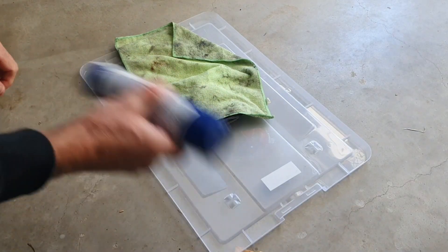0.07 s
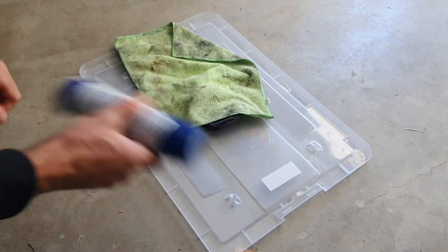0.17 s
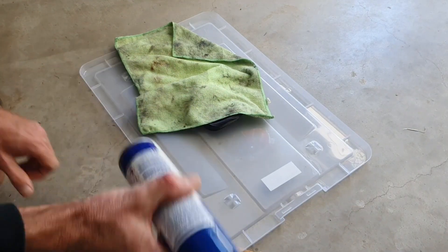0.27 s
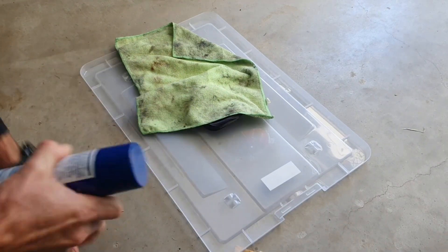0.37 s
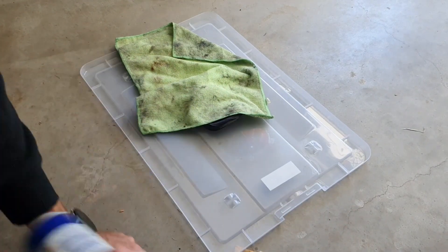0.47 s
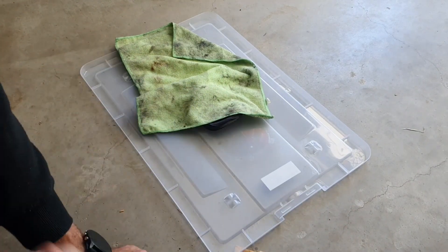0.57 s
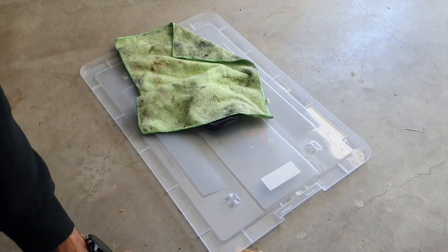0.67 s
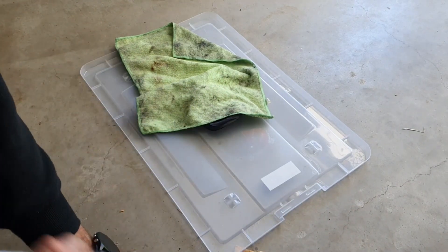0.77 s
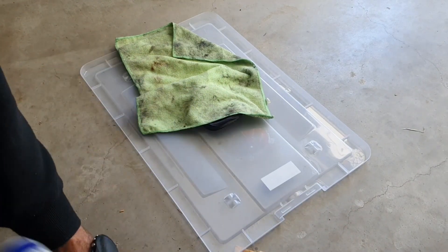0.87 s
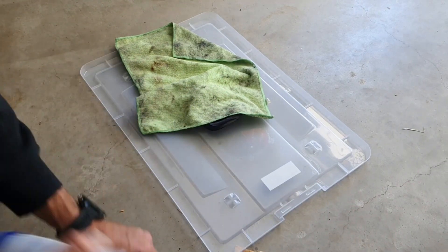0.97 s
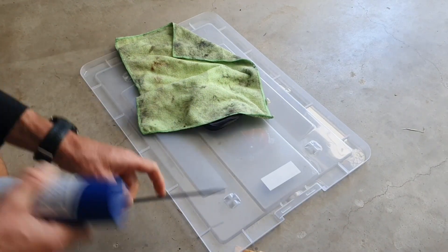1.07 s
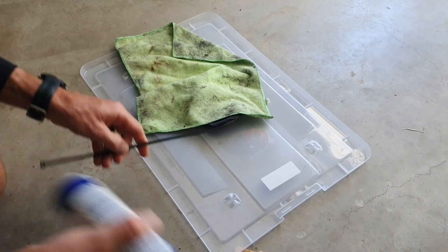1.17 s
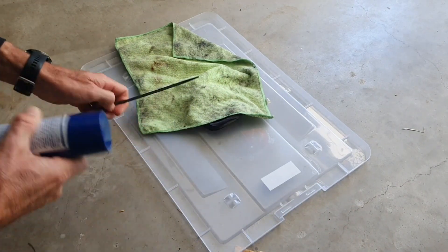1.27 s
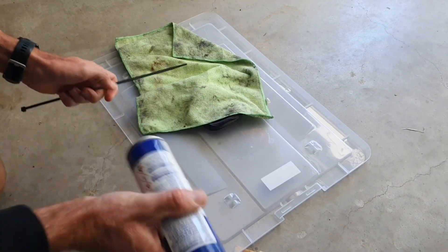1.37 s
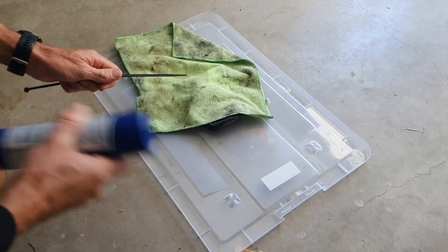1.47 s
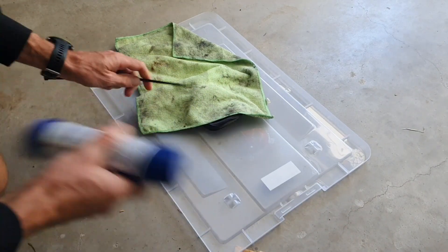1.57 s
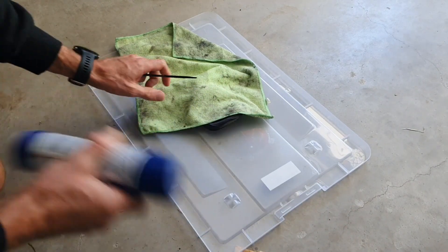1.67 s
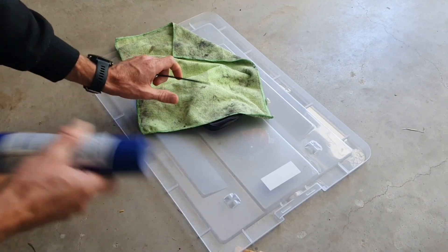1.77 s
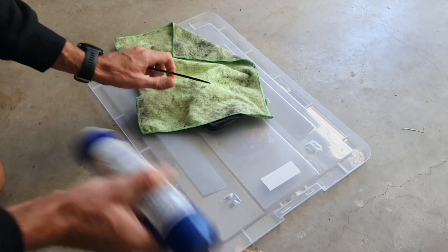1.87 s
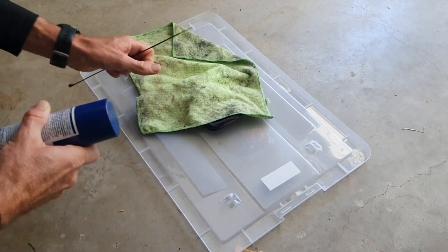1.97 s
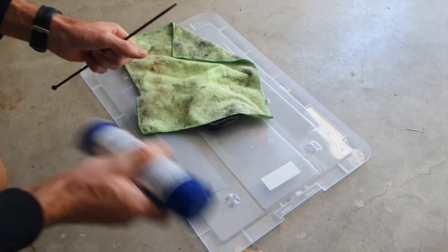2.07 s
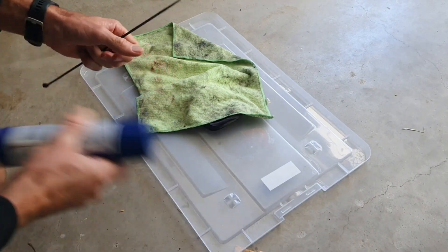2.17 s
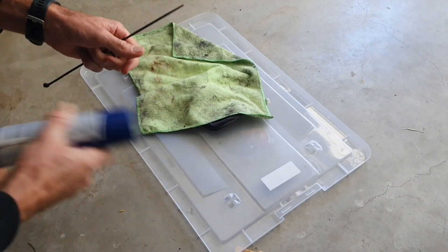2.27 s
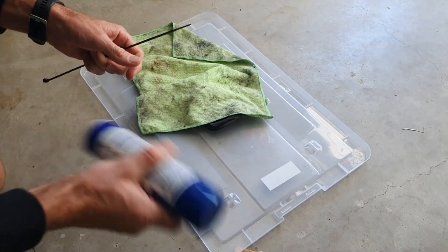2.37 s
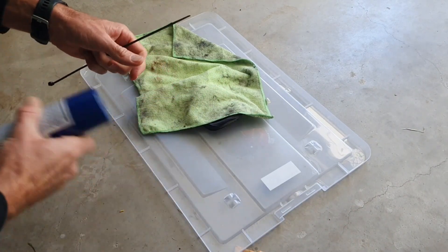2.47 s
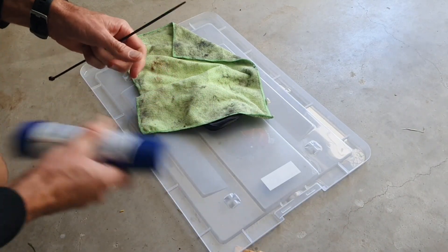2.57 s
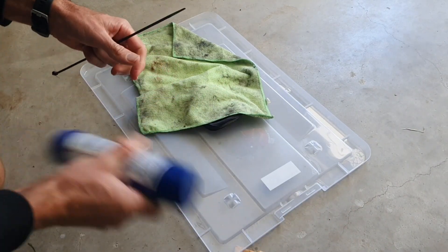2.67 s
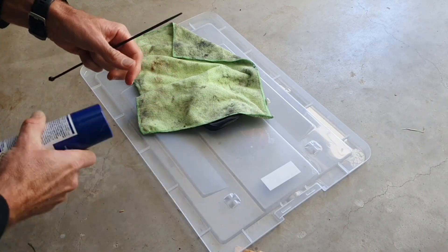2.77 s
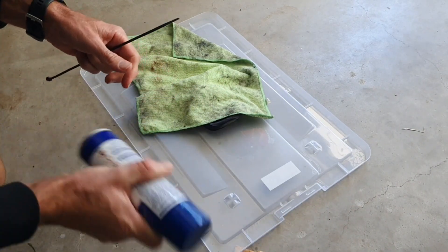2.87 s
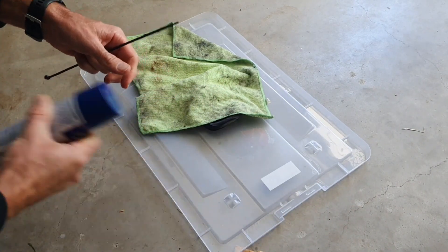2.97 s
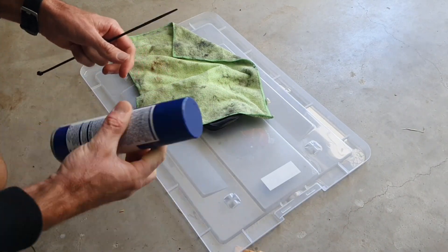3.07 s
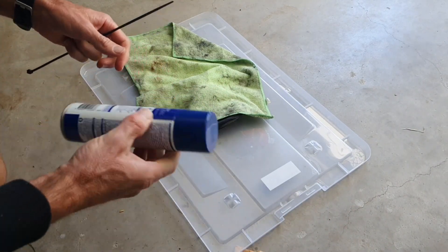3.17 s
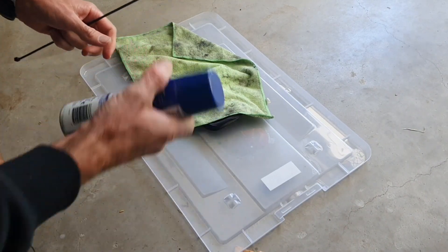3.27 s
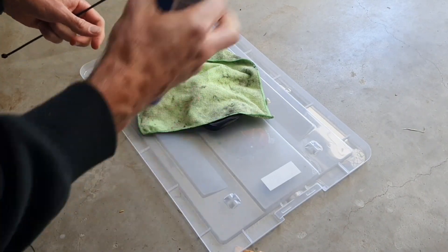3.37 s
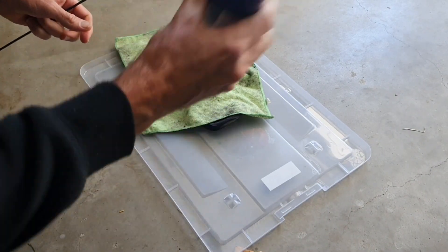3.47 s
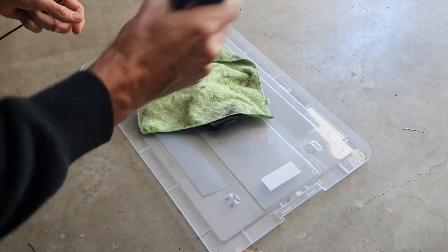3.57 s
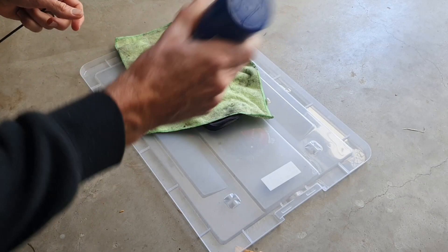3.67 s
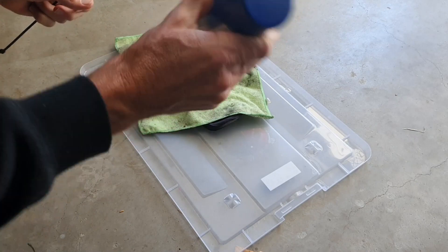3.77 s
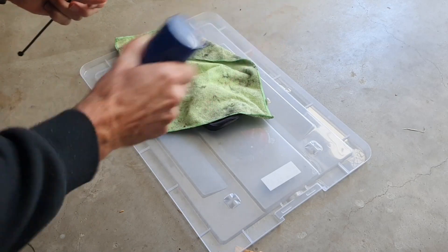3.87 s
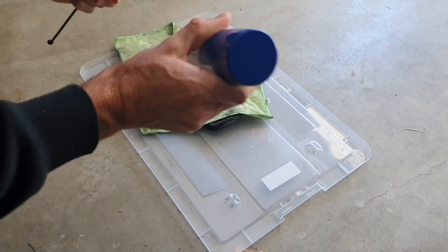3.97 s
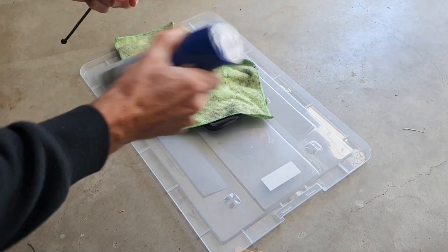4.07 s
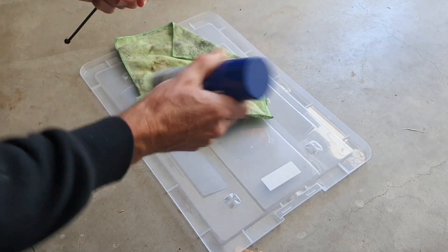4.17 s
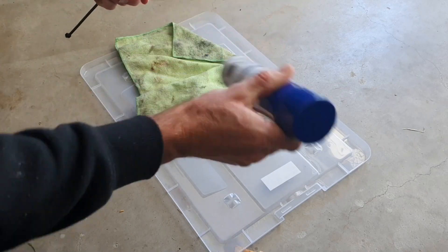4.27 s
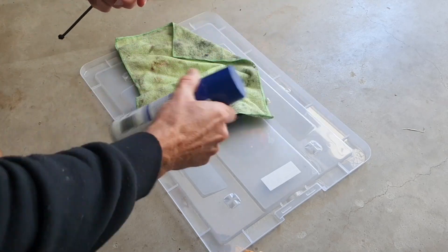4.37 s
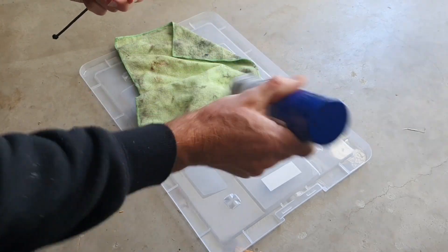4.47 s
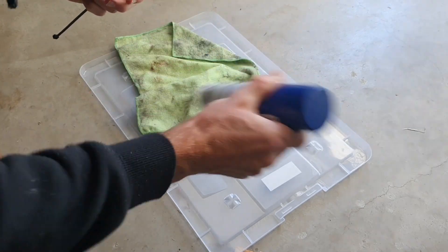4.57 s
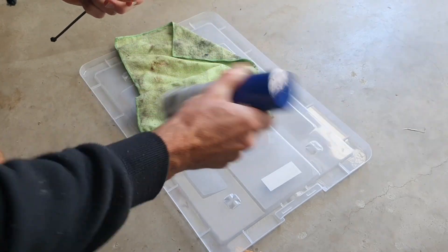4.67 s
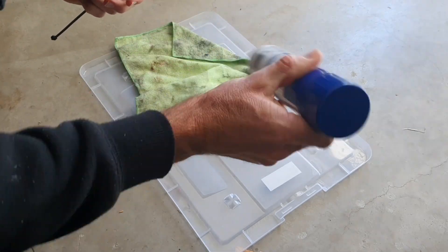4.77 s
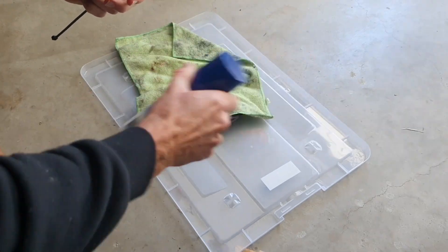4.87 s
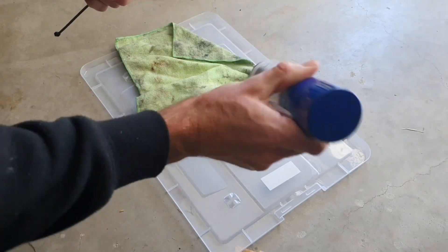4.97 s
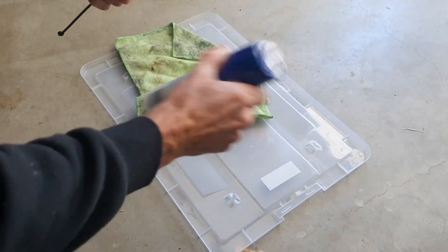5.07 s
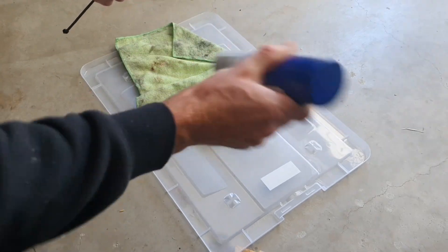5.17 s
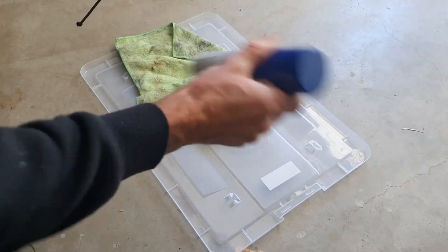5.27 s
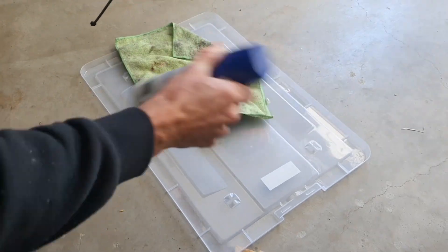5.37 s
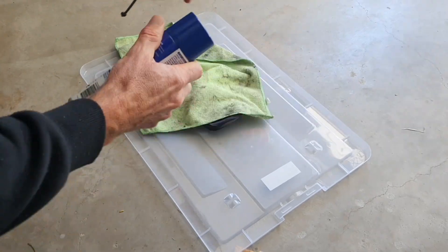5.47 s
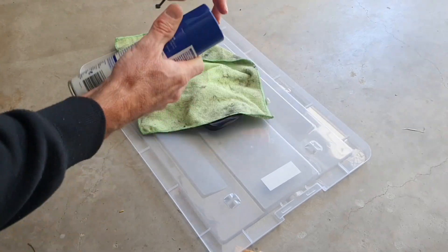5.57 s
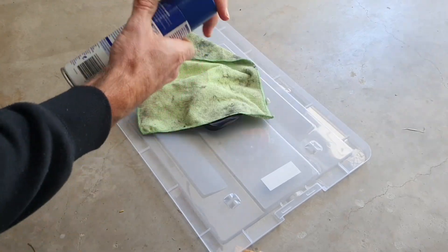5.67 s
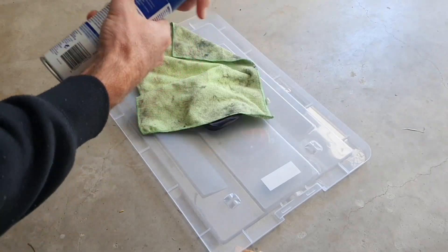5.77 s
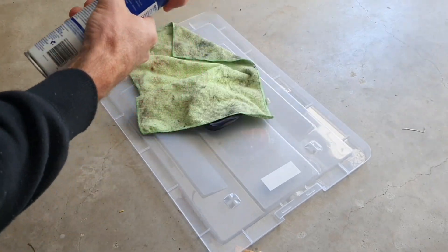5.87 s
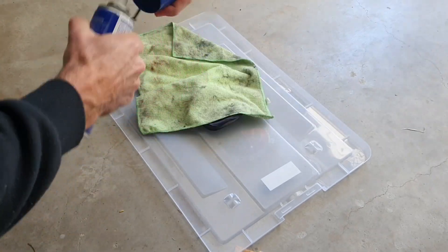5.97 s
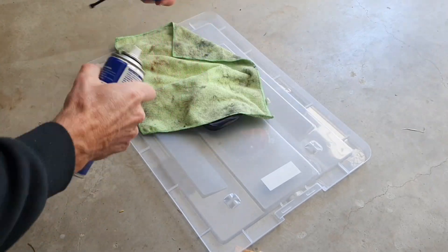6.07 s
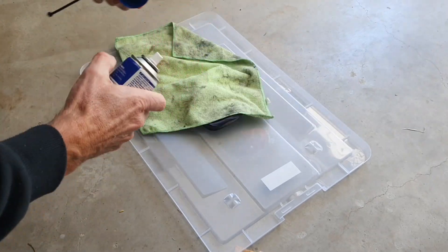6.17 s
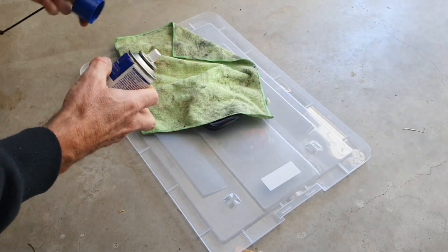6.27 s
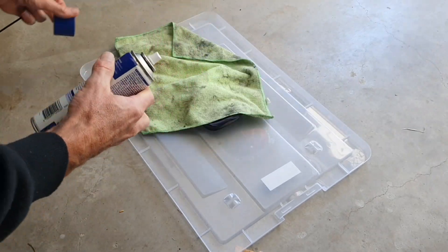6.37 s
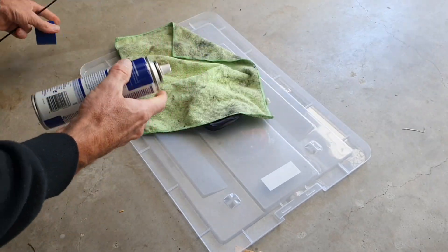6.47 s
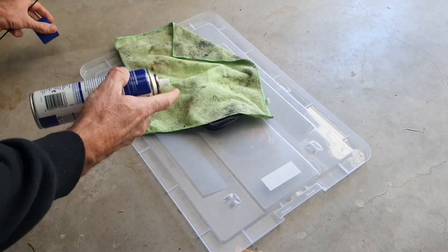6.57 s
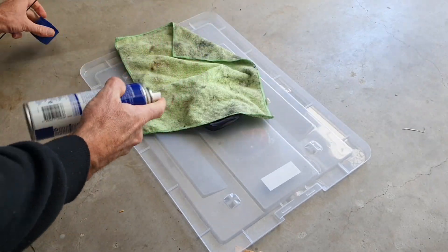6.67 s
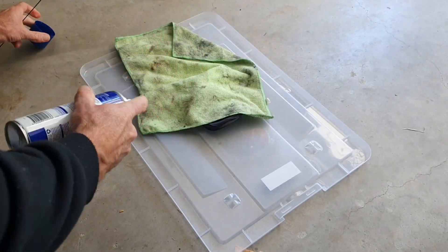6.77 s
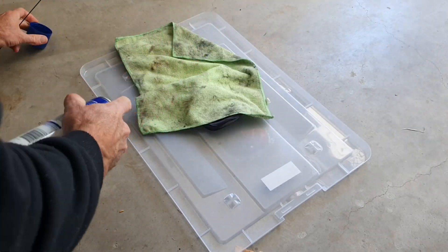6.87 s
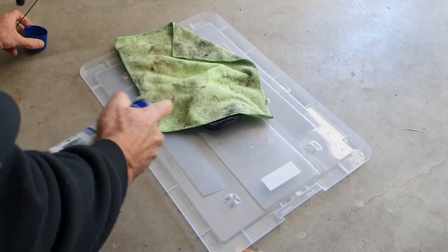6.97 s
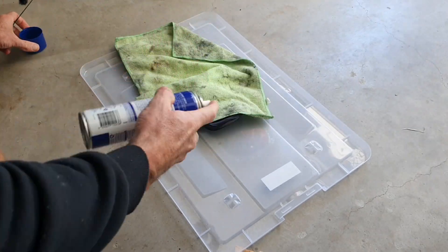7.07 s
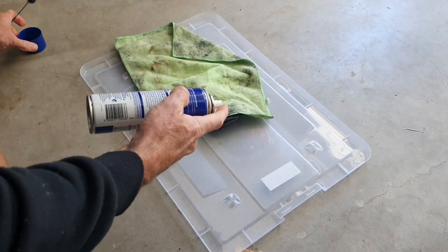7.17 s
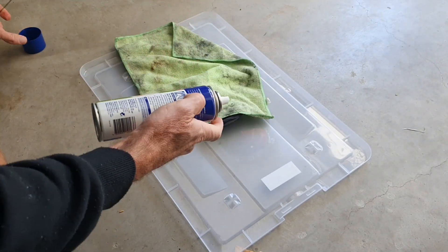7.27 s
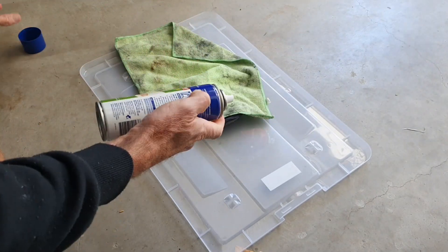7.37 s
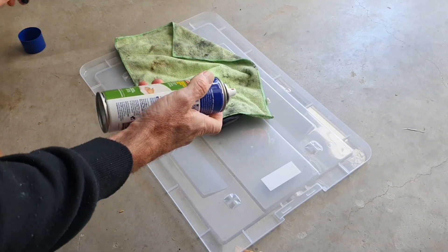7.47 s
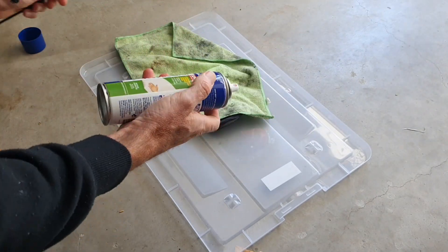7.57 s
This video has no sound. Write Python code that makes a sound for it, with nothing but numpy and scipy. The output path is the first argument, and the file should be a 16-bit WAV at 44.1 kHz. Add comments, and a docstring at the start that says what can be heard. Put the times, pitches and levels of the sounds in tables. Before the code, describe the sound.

Two bursts of loud, sharp spray-can rattling, roughly three seconds and two seconds long, separated by a brief lull with faint rustling. Each shake mixes metallic clacks with hissy liquid slosh and short garage reflections. Then quiet handling: a cap pulled off with a snap, hollow plastic bouncing on concrete, airy rustles, and light ball ticks as the can turns. Close stereo microphone, source left, faint low rumble behind.

```python
"""Over soft rumble and air, a steel can is shaken in two bursts just above a concrete garage floor, to the left.
A mixing ball rings the dull base and bright wall; noise makes the liquid slosh, with a faint hiss before each blow.
Low thuds join in during the first burst, and small whistles and rustles begin between the bursts.
Then the plastic cap comes off with clicks and a rush of noise, and is set down with hollow knocks.
At the end the ball rolls and ticks as the can is turned, and the loosely held can rings on."""
import sys
import numpy as np
from scipy import signal
from scipy.io import wavfile
from scipy.ndimage import uniform_filter1d

SR = 44100
rng = np.random.default_rng(int(sys.argv[2]) if len(sys.argv) > 2 else 0)


def store_pcm(level_fs):
    """Save levels as 16-bit WAV."""
    pcm = np.round(np.clip(level_fs, -1, 1) * 32767).astype(np.int16)
    wavfile.write(sys.argv[1], SR, np.atleast_2d(pcm).T)


def ratio_of_db(decibels):
    """Turn decibels (scalar or array-like) into linear amplitude factors; 0 dB maps to 1."""
    return 10 ** (np.asarray(decibels, float) / 20)


N = 336218  # length of the scene in samples


def evened(x):
    """Scales a signal to an rms of 1."""
    return x / np.sqrt(np.mean(x ** 2) + 1e-20)


def read(points, hz):
    """Reads a spectrum table on a log-frequency axis."""
    f, value = np.transpose(points)
    return np.interp(np.log(hz + 1), np.log(f + 1), value)


def curve(rows, t):
    """Reads a curve at times t."""
    return np.interp(t, *np.transpose(rows))


# how alike noise is in the two ears: (frequency [Hz], likeness [0 to 1])
EAR_LIKENESS = [(60, 0.98), (130, 0.82), (300, 1), (700, 0.083), (15000, 0.099)]


def hiss(colour, size, flicker_db=0, patchy_db=0, likeness=0):
    """Stereo noise of rms 1 from random short-time spectra, with level flicker and patches of changing colour."""
    hop = size // 4
    hz = np.fft.rfftfreq(size, 1 / SR)
    frames = N // hop + 5
    a, b, c, d, e = rng.standard_normal((frames, len(hz), 5)).T
    smooth = uniform_filter1d(uniform_filter1d(e, size=5, axis=0), size=20, axis=1)
    patches = patchy_db * evened(smooth)
    same = np.clip(np.maximum(read(EAR_LIKENESS, hz), likeness), 0, 1)[:, None]
    left = a + 1j * b
    right = same * left + np.sqrt(1 - same ** 2) * (c + 1j * d)
    flicker = flicker_db * evened(uniform_filter1d(rng.standard_normal(frames), size=3))
    spectra = np.array([left, right]) * ratio_of_db(read(colour, hz)[:, None] + flicker + patches)
    return evened(signal.istft(spectra, nperseg=size, noverlap=size - hop)[1][:, :N])


def ring(modes, count, weight_db=0, detune=0.053, scatter_db=4.5, apart=0.88, contact_s=0.00025,
         start_db=-7.5, chatter_db=-3):
    """Sums dying sines per blow and ear, start_db rms over the first 3 ms; pitch, level and phase scatter."""
    alike_hz = 1480  # lower modes reach both ears more nearly in step
    chatter_s = .0015  # each sound rebounds a few times within one blow
    modes = modes + modes  # every mode becomes a close pair
    hz, db, t60 = np.array(modes).T[:, None, :, None]
    t = np.arange(1024) / SR
    a, b, c, d = np.moveaxis(rng.standard_normal((count, len(modes), 1, 4)), 3, 0)
    level = ratio_of_db(db + weight_db + scatter_db * a) * ratio_of_db(-60 * t / t60)
    phase = 2 * np.pi * hz * (1 + detune * b) * t + 1.1 * c
    ear_shift = apart * d * np.minimum(hz / alike_hz, 1)
    ears = np.array([(level * np.sin(phase + ear * ear_shift)).sum(1) for ear in range(2)])
    lag = np.arange(256) / SR
    rebounds = ratio_of_db(chatter_db) * rng.standard_normal((count, 256)) * (rng.random((count, 256)) < .06)
    rebounds = rebounds * np.exp(-(lag / chatter_s) ** 2) + (lag == 0)
    softened = ears * np.minimum(t / contact_s, 1)
    ears = signal.fftconvolve(softened, rebounds[None], axes=2)[..., :1024]
    return ratio_of_db(start_db) * ears / np.sqrt((ears[..., :128] ** 2).mean((0, 2), keepdims=True))


def place(times, sounds, echo_db=0):
    """Lays each sound (ear, event, sample) at its time with a duller floor echo; the lowest bass is filtered out."""
    floor_echo_s, floor_echo_db = .0017, [-5, -4]  # usual delay; level for left and right
    spread = .3  # chance spread of the echo delay from sound to sound
    out = np.zeros((2, N + 2048))
    chance = rng.standard_normal((len(times), 2))
    dulled = signal.lfilter([1 - .4], [1, -.4], sounds)
    for k, s in enumerate(times):
        at = round(s * SR)
        out[:, at:at + 1024] += sounds[:, k]
        for ear in range(2):
            stretch = max(1 + spread * chance[k, 0] + .05 * ear * chance[k, 1], .3)
            late = at + round(floor_echo_s * SR * stretch)
            out[ear, late:late + 1024] += ratio_of_db(floor_echo_db[ear] + echo_db) * dulled[ear, k]
    return signal.sosfilt(signal.butter(2, 340, "high", fs=SR, output="sos"), out[:, :N])


# distant traffic and arm movement: (time [s], level [dB])
RUMBLE_LEVEL = [(0, -56), (2.2, -55), (2.9, -61.5), (4.1, -53), (5.3, -53.5), (5.8, -62), (7.62, -61.5)]
# colour of the rumble: (frequency [Hz], relative level [dB per Hz])
RUMBLE_COLOUR = [(12, -31), (25, 2), (45, -1.5), (60, 7.5), (70, -7), (87, 3.5), (110, -4.5), (160, -9.5),
                 (200, -8), (260, -15), (350, -22), (500, -66.5)]


def rumble():
    """Deep noise whose level follows a slow curve."""
    return hiss(RUMBLE_COLOUR, size=4096) * ratio_of_db(curve(RUMBLE_LEVEL, np.arange(N) / SR))


# colour of the quiet garage: (frequency [Hz], relative level [dB per Hz])
AIR_COLOUR = [(200, -18), (330, -8.5), (450, -11), (650, -14.5), (1280, -18), (2890, -24.5), (4500, -25.5),
              (7300, -32.5), (8800, -24.5), (14500, -29.5), (16000, -50)]


def air():
    """Faint, slightly flickering noise of the quiet garage."""
    return hiss(AIR_COLOUR, size=1024, flicker_db=.8) * ratio_of_db(-77.5)


# liquid washing and fingers shifting: (time [s], level [dB])
WASH_LEVEL = [(0, -35.5), (.45, -51), (.6, -66.5), (.9, -48), (1.3, -41), (2.1, -47.5), (2.74, -40),
              (3.08, -43.5), (3.17, -85.5), (3.45, -54.5), (3.5, -49), (4.3, -43), (5.4, -49), (5.5, -51),
              (5.72, -65), (5.95, -78), (6.08, -61), (6.25, -72), (6.48, -100), (6.8, -70), (6.9, -75),
              (7.28, -84.5), (7.33, -61), (7.52, -77), (7.62, -79)]
# colour of the wash: (frequency [Hz], relative level [dB per Hz])
WASH_COLOUR = [(120, -54.5), (210, -26.5), (330, -3), (749, -10), (1140, 0.5), (1370, 3.5), (2050, 0),
               (2210, -7), (4950, -10.5), (7010, -23), (8420, -10), (11300, -29.5), (14900, -30.5),
               (16000, -56.5)]
# colour of the splash and of the hiss before it: (frequency [Hz], relative level [dB per Hz])
SPLASH_COLOUR = [(300, -31), (1000, 0.5), (2000, -3.5), (3500, 3.5), (5200, -2.5), (7000, -8), (8600, -6.5),
                 (12000, -9.5), (15000, -12), (16500, -50.5)]


def slosh():
    """Wash noise, plus brighter noise: a faint hiss swells just before each blow and a splash follows it."""
    usual_blow_db, splash_db, spread_db = -20, -38.5, 3  # splash peak after a usual blow, and its chance
    fading, growth = 1.2, 0.5  # dB lost per dB of a lighter blow, gained per dB of a harder one
    rise_s, t60 = 0.003, 0.27  # splash swelling, and time to die by 60 dB
    lead_in_db, lead_in_s = -26, .008  # hiss before the blow: last level under the blow, growing time
    dull_from_db, lead_in_dull, splash_dull = -6, 0.34, 0.033  # dB lost per dB of base strength above this
    grit_db, grit_s = 2.2, .001  # droplets break the splash into grains
    t = np.arange(N) / SR
    s, db, base_db, *_ = np.transpose(BLOWS)
    at = np.round(s * SR).astype(int)
    dulling = np.maximum(base_db - dull_from_db, 0)  # blows on the base hiss and splash less
    harder = db - usual_blow_db
    peak_db = splash_db + np.minimum(fading * harder, growth * harder)
    peak_db += spread_db * rng.standard_normal(len(s)) - splash_dull * dulling

    splash_power = np.zeros(N)
    np.add.at(splash_power, at, ratio_of_db(2 * peak_db))
    u = t[:SR // 3]
    swell = (1 - np.exp(-u / rise_s)) ** 2 * ratio_of_db(-2 * 60 * u / t60)
    splash_power = signal.oaconvolve(splash_power, swell / swell.max())[:N]

    lead_in_power = np.zeros(N)
    np.add.at(lead_in_power, at, ratio_of_db(2 * (lead_in_db + db - lead_in_dull * dulling)))
    lead = round(4 * lead_in_s * SR)
    growing = np.exp(2 * (t[:lead] - t[lead]) / lead_in_s)
    lead_in_power = signal.oaconvolve(lead_in_power, growing)[lead:]  # moved earlier, to end at the blow
    level = np.sqrt(abs(splash_power + np.pad(lead_in_power, (0, 1))[:N]))

    grit = ratio_of_db(grit_db * evened(uniform_filter1d(rng.standard_normal(N), size=round(grit_s * SR))))
    bright = hiss(SPLASH_COLOUR, size=128, flicker_db=1.0, patchy_db=3.5, likeness=0.078)
    wash = hiss(WASH_COLOUR, size=256, flicker_db=3.0, patchy_db=6.0, likeness=0.095)
    return level * evened(grit) * bright + wash * ratio_of_db(curve(WASH_LEVEL, t))


def ticks(level):
    """Small random touches of the ball between the blows, stronger the more the liquid is stirred."""
    per_s, tick_db, spread_db, at_rest_db = 170, -4, 2.5, -52  # strength is set against the slosh level
    draws = rng.random((round(per_s * N / SR), 3))
    s = draws[:, 0] * N / SR
    stirred = level[(s * SR).astype(int)]
    size = stirred * ratio_of_db(tick_db - spread_db * np.log(draws[:, 1] + 0.0068))
    size *= stirred > ratio_of_db(at_rest_db)  # the ball lies still once the liquid settles
    low = draws[:, 2, None]  # share of the touch that reaches the base
    spot = np.arange(len(s)) % 150  # places on the wall that are touched
    wall, base, contact = (ring(modes, count=150)[:, spot] for modes in (WALL, BASE[1:], CONTACT))
    sound = wall + low * base + 1.8 * contact
    return place(s, sound * size[:, None])


# blows of the ball, and near 6 s clicks of cap and fingers against the can:
# (time [s], wall strength [dB], base strength [dB added to wall],
# sharp contact strength [dB added to wall], best-excited wall pitch [Hz])
BLOWS = [(0.0198, -24.5, -0.5, -10.5, 3390), (0.0599, -9.5, -28, -9.5, 5020), (0.1262, -17, -8, -4, 4430),
         (0.2183, -11.5, -29, -8.5, 2860), (0.2896, -19, -0.5, -9.5, 2390),
         (0.375, -8.5, -28.5, -14.5, 5100), (0.437, -24, 7, -9.5, 2450), (0.4657, -21, 0, -10.5, 3200),
         (0.5347, -10, -17.5, -7.5, 4460), (0.5434, -14.5, -42, -20.5, 3840),
         (0.605, -25, -21, -14.5, 2180), (0.6191, -26, -2, -26, 3350), (0.6695, -32.5, -19.5, -2.5, 2950),
         (0.7566, -21, -5, -6.5, 3680), (0.7754, -7.5, -23, -11, 5420), (0.86, -21, -6.5, -10, 3200),
         (0.9, -28.5, -8.5, -12.5, 3220), (0.9385, -27, -4, -15.5, 3390), (0.967, -19.5, -23, -4.5, 3100),
         (1.062, -21.5, -9.5, -7, 2750), (1.091, -38, 11, -1, 3360), (1.1222, -23.5, 1, -13, 2400),
         (1.1256, -12.5, -36.5, -12, 3430), (1.1361, -21, -11.5, -12.5, 3520),
         (1.147, -23.5, -8, -12.5, 2370), (1.227, -19.5, -4.5, -4, 5270), (1.2528, -24, -9, -15, 2290),
         (1.2998, -16, -29, -5, 2978), (1.3085, -15.5, -19.5, -16, 3150), (1.3926, -17.5, -6.5, -7, 5030),
         (1.417, -27.5, -4.5, -4, 3570), (1.4613, -7.5, -20, -10, 5090), (1.5288, -13.5, -8.5, -6.5, 4960),
         (1.58, -30, -16, -16, 3600), (1.6035, -34, -2, -7, 2570), (1.6335, -6.5, -26.5, -11.5, 2320),
         (1.728, -20, -7.5, -9.5, 4530), (1.734, -28.5, 4.5, -1, 4400), (1.8117, -26, -6, -19.5, 3400),
         (1.8257, -13.5, -30, -6, 5430), (1.8408, -22, -24, -8, 3080), (1.8861, -20.5, -1, -10, 4680),
         (1.9971, -9.5, -20.5, -8, 2520), (2.076, -22.5, 2.5, -6, 4880), (2.1538, -10.5, -17.5, -12, 3030),
         (2.2192, -19, -7, -10.5, 4900), (2.292, -25.5, -9.5, -3, 2190), (2.3283, -37, 8.5, -1, 3440),
         (2.357, -12, -20, -7, 5080), (2.3728, -30.5, 4, -33.5, 3740), (2.4317, -23, -3.5, -3.5, 3064),
         (2.4537, -24, -2.5, -17.5, 3360), (2.4866, -8, -21, -7, 4850), (2.569, -22, -6, -7, 4950),
         (2.597, -27.5, 0.5, -9.5, 3330), (2.636, -3.5, -23, -10, 4990), (2.716, -18, -5, -7, 4630),
         (2.8002, -9.5, -43, -9, 3750), (2.876, -18.5, -4.5, -3.5, 4830), (2.8974, -25.5, -7, -10.5, 3930),
         (2.9434, -14.5, -11, 1, 3410), (3.0466, -19.5, -8.5, -2.5, 2980), (3.086, -41, 13.5, -16, 2270),
         (3.103, -38, -10, -1, 3330), (3.2192, -58, 2, -6, 4970), (3.229, -63, 8.5, -2, 5030),
         (3.4058, -30, -2, -3, 2830), (3.4692, -34, -2.5, -6, 3230), (3.51, -30, -3.5, -13, 3340),
         (3.5326, -31, -2.5, -8, 2380), (3.569, -19, -38, -9, 2940), (3.6256, -20, 1.5, -5, 3070),
         (3.689, -28.5, -5, -15, 3740), (3.7195, -24.5, -30, -19.5, 2750),
         (3.7299, -17, -26.5, -11.5, 3900), (3.7447, -21, -34.5, -6.5, 3110),
         (3.7991, -22.5, 5, -5.5, 2610), (3.8864, -8.5, -20, -14.5, 5070), (3.9675, -16.5, 3, -9, 2530),
         (4.0635, -6, -23.5, -13.5, 4040), (4.138, -19, 2.5, -5.5, 3130),
         (4.2401, -8.5, -20.5, -16.5, 2920), (4.2992, -14, -2.5, -11, 2770), (4.3886, -5, -21, -10.5, 4710),
         (4.458, -18, 0, -14.5, 2740), (4.5606, -21.5, -32.5, -1.5, 3900), (4.5626, -9, -17.5, -13, 5080),
         (4.6303, -19, 4, -5.5, 4460), (4.7388, -10.5, -24, -12.5, 3040), (4.7941, -25.5, 7, 2.5, 4400),
         (4.8238, -31, 3, -15.5, 3120), (4.8785, -9, -13, -4, 3803), (4.8868, -10, -31, -13, 4450),
         (4.964, -24.5, -6, -10.5, 3960), (4.9779, -22, -12, -13, 3020), (5.012, -28, -8.5, -11.5, 2390),
         (5.0814, -6.5, -42.5, -17, 4510), (5.1008, -33.5, 2, -16.5, 3790), (5.1464, -16, 2, -6, 2980),
         (5.1618, -31, 11, -16, 3010), (5.2056, -23.5, 0, -11, 3720), (5.2565, -10.5, -13.5, -11, 5170),
         (5.3135, -17.5, 6, -6.5, 2510), (5.4031, -7.5, -24, -13, 3490), (5.466, -18.5, 0, -14, 2890),
         (5.504, -34, -18, -17, 2370), (5.583, -35.5, 2.5, -7, 2180), (5.6439, -35, -3.5, -13, 2270),
         (5.6802, -52.5, 8, -18, 3220), (5.7258, -45, -11.5, -5.5, 3290), (5.7805, -50.5, -30.5, -3, 3370),
         (5.907, -45.5, 0, -6.5, 3480), (5.9498, -56, 7, -2, 2220), (6.0197, -28.5, -8.5, -0.5, 4210),
         (6.028, -37, -13, -1, 3500), (6.096, -41, -7, -9, 2500), (6.1017, -35, -12, -12, 2390),
         (6.17, -40.5, -27.5, -9, 2410), (6.2128, -64, -19, -18.5, 3320), (7.113, -59.5, -8, -9.5, 4500),
         (7.317, -37.5, -26, -8.5, 3600), (7.364, -42, -23, -8.5, 2330), (7.41, -48, -11, -4, 2340),
         (7.428, -38.5, -34, -9.5, 2340), (7.4563, -46.5, -22, -3, 2340), (7.4822, -42, -29, -17, 2330),
         (7.5, -42.5, -38, -4, 2370), (7.5178, -40, -35, -3.5, 2320), (7.54, -57, -23, -11.5, 2360),
         (7.598, -40.5, -31.5, -13.5, 4750)]
# modes of the gripped, liquid-damped can, first its base: (frequency [Hz], level [dB], time to die by 60 dB [s])
BASE = [(390, -15, .014), (900, -24, .008), (1115, 0, .025), (1320, -4, .011), (1520, -2, .013),
        (1720, -4, .010), (1950, -11, .008)]
# modes of the can wall: (frequency [Hz], level [dB], time to die by 60 dB [s])
WALL = [(1700, -7, .004), (2200, -3, .004), (2600, -1, .0035), (3000, 0, .004), (3400, 0, .004),
        (3800, 0, .0035), (4200, 0, .0035), (4600, 0, .004), (5050, 2, .007), (5500, -3, .003),
        (6000, -7, .003)]
# modes of the sharp contact: (frequency [Hz], level [dB], time to die by 60 dB [s])
CONTACT = [(6520, 2, 0.0026), (8670, 3, 0.0089), (10210, 3.5, 0.007), (10260, 10, 0.0005),
           (11660, 11, 0.0023), (14800, -1, 0.0006), (15600, -16, 0.0027)]


def blows_on_can():
    """Each blow or click rings base, wall and contact modes in its own balance."""
    s, db, base_db, contact_db, hz = np.transpose(BLOWS)
    pitches = np.array(WALL + WALL)[:, 0]
    near = -5 * abs(np.log2(pitches / hz[:, None]))[..., None]  # dB per octave from the struck spot's pitch
    wall = ring(WALL, len(s), near, apart=0.79)
    base = ring(BASE, len(s), detune=.025, scatter_db=2.5, apart=.7, contact_s=.0007, start_db=-4, chatter_db=-10)
    contact = ring(CONTACT, len(s), apart=1.1, contact_s=.00012, start_db=-1)
    bright = (wall + ratio_of_db(contact_db)[:, None] * contact) * ratio_of_db(db)[:, None]
    dull = base * ratio_of_db(db + base_db)[:, None]
    return place(s, bright) + place(s, dull, echo_db=-5)  # the dull base ring has a weaker floor echo


# how long the garage rings: (frequency [Hz], time to die by 60 dB [s])
GARAGE_T60 = [(250, 1), (660, 0.19), (1740, 0.29), (4590, 0.24), (12100, 0.12)]


def garage(x):
    """Sparse random-sign echoes dying band by band; tails take turns so that no tone stands still in the reverb."""
    level_db, wall_delay_s, fill_s = -10.5, 0.0046, 0.0043
    taps = np.zeros((3, 2, SR // 2))
    grid = np.arange(round(wall_delay_s * SR), SR // 2 - 12, 12)
    at = grid + rng.integers(0, 12, (3, 2, len(grid)))
    np.put_along_axis(taps, at, rng.choice([-1., 1.], at.shape), 2)
    hz, t, z = signal.stft(taps, SR, nperseg=256)
    fade = ratio_of_db(-60 * t / read(GARAGE_T60, hz)[:, None]) * np.minimum(t / fill_s, 1)
    tails = signal.istft(z * fade, SR, nperseg=256)[1]
    cycles = 2.3 * np.arange(N) / SR + np.arange(3)[:, None, None] / 3  # a steady 2.3 rounds a second
    turns = np.sqrt(2 / 3) * np.cos(2 * np.pi * cycles)
    echoes = signal.fftconvolve(turns * x.mean(0), tails / np.linalg.norm(tails[0, 0]), axes=2)
    return ratio_of_db(level_db) * echoes.sum(0)[:, :N]


# low thuds through the floor and the hand:
# (time [s], level [dB], starting pitch [Hz], time to die by 60 dB [s])
THUDS = [(1.763, -30, 91.6, 0.4), (1.799, -36, 63.3, .75), (1.81, -46, 132, 0.5), (5.993, -36, 73, 0.17),
         (6.004, -23, 131, 0.015)]


def thuds():
    """Low dying swings whose pitch sags."""
    u, out = np.arange(SR) / SR, np.zeros(N)
    for s, db, hz, t60 in THUDS:
        swing = np.sin(2 * np.pi * hz * u * (1 - 0.14 * u))
        out[round(s * SR):][:SR] += ratio_of_db(db - 60 * u / t60) * np.minimum(u / 0.0059, 1) * swing
    return out


# airy whistles and rustles (cloth, a squeak of the grip, the cap sliding, the ball rolling):
# (start [s], length [s], level before fading [dB], first pitch [Hz], last pitch [Hz], width [Hz])
WHISTLES = [(5.81, .11, -72, 1750, 1520, 120), (5.9, .035, -61, 1500, 1420, 300),
            (6.2, .07, -73, 3300, 3444, 900), (3.215, .16, -68, 1250, 1150, 500),
            (6.765, .06, -73, 10500, 9500, 3000), (6.835, .07, -75, 6500, 5500, 4000),
            (7.17, .07, -78, 9500, 9500, 3000), (7.3, .08, -61, 4200, 4300, 1300),
            (6.854, .15, -66, 1050, 1150, 600), (6.84, .13, -66, 2300, 2200, 1500),
            (6.96, .23, -66.5, 1150, 1300, 350), (7.15, .15, -68, 1300, 1600, 450),
            (7.18, .09, -75, 2300, 2300, 600), (7.42, .15, -59, 3800, 3500, 2600),
            (7.075, .09, -76, 3500, 3550, 500), (7.075, .08, -78, 5000, 5000, 900),
            (7.33, .07, -67, 2800, 2750, 160), (7.46, .14, -60, 2350, 2310, 110)]


def whistles():
    """Noise through one gliding resonance, applied twice, swelling and fading."""
    peak_at, slip_db, wander = 0.27, 3, .2  # loudest share of length; catch and slip; pitch wander in widths
    out = np.zeros((2, N))
    for start, length, db, first_hz, last_hz, width_hz in WHISTLES:
        at = np.arange(round(start * SR), min(round((start + length) * SR), N))
        u, r = np.linspace(0, 1, len(at)), np.exp(-np.pi * width_hz / SR)
        slow = rng.standard_normal((2, len(at), 2)) @ [1, 1j]
        slow = signal.lfilter([1], [1, -2 * r, r * r], slow + .5 * slow[::-1])  # each ear hears some of the other
        slow *= ratio_of_db(slip_db * evened(uniform_filter1d(rng.standard_normal(len(at)), size=300)))
        wander_hz = wander * width_hz * evened(uniform_filter1d(rng.standard_normal(len(at)), size=900))
        pitch_hz = first_hz + (last_hz - first_hz) * u + wander_hz
        turn = np.exp(2j * np.pi * np.cumsum(pitch_hz) / SR)  # lifts the slow noise to the pitch
        arch = np.minimum(u / peak_at, (1 - u) / (1 - peak_at))
        out[:, at] += evened((slow * turn).real) * ratio_of_db(db) * np.sqrt(abs(arch))
    return out


# colour of the rush as the cap comes off: (frequency [Hz], relative level [dB per Hz])
PULL_COLOUR = [(88, -29), (150, 0), (923, -6.5), (1940, 1), (2810, -12), (4000, -9.5), (11500, -7.5),
               (16000, -37)]


def cap_pull():
    """A rush of noise that swells and dies steeply as the cap comes off."""
    pop_s, pop_db, swell_db_per_s, dying_db_per_s, reach_s = 6.016, -41, 420, 450, .065
    u = np.arange(N) / SR - pop_s
    level = ratio_of_db(pop_db - np.maximum(-swell_db_per_s * u, dying_db_per_s * u))
    level *= np.clip((reach_s - abs(u)) / 0.0144, 0, 1)
    return hiss(PULL_COLOUR, size=256, flicker_db=1.0, likeness=0.68) * level


# the cap knocks and bounces on the floor: (time [s], level [dB])
CAP_KNOCKS = [(6.8382, -38), (6.8458, -39), (6.8538, -45), (6.858, -43), (6.871, -46), (6.881, -45)]
# modes of the hollow cap: (frequency [Hz], level [dB], time to die by 60 dB [s])
CAP_MODES = [(806, -10, .02), (1000, 2, .02), (1180, 3, .018), (1400, -1, .02), (1750, -5, .015),
             (2050, -6, .012), (2350, -4, .014), (2830, -8, .012), (3300, -9, .008), (4400, -14, .006)]


def cap_knocks():
    """Hollow plastic knocks: a soft contact rings the cap's modes."""
    s, db = np.transpose(CAP_KNOCKS)
    return place(s, ring(CAP_MODES, len(s), scatter_db=1.0, contact_s=0.002) * ratio_of_db(db)[:, None])


# once the grip slackens the can rings on: (frequency [Hz], level [dB], time to die by 60 dB [s])
LOOSE_MODES = [(1110, -18, .04), (2315, -10, .1), (2790, -18, .05), (2370, -13, .06), (3420, -14, .04)]


def loose_ring():
    """Late, low-pitched touches of the ball set the loosely held can ringing."""
    touches, t = np.zeros(N), np.arange(SR // 8) / SR
    for s, db, *_, hz in BLOWS:
        loose = s > 7.42 and hz < LOOSE_MODES[2][0]
        touches[round(s * SR)] = ratio_of_db(db) * loose * rng.choice([-1, 1])
    body = sum(ratio_of_db(db - 60 * t / t60) * np.sin(2 * np.pi * hz * t) for hz, db, t60 in LOOSE_MODES)
    return signal.oaconvolve(touches, body)[:N]


# where the can is held: (time [s], left over right [dB])
SWING = [(0, 5), (2.8, 4.5), (5.5, 3), (6.2, 11), (6.8, 8.5), (7.62, 5.5)]


def scene():
    """Can and cap to the left, with their room, over thuds, rumble and air."""
    cap_room_db = 3.5  # the cap is farther off, so wetter
    shade, shade_hz, right_late_s = 0.27, 5100, .00005  # share of treble lost on the right; its delay
    side = ratio_of_db(np.outer([.5, -.5], curve(SWING, np.arange(N) / SR)))
    blows, cap, liquid = blows_on_can(), cap_pull() + cap_knocks(), slosh()
    stirred = np.sqrt(abs(uniform_filter1d((liquid ** 2).mean(0), size=1024)))
    room = garage(blows + ratio_of_db(cap_room_db) * cap)
    near = side * (blows + cap + liquid + ticks(stirred) + whistles() + loose_ring())
    treble = signal.lfilter(*signal.butter(1, shade_hz, "high", fs=SR), near[1])
    near[1] = np.roll(near[1] - shade * treble, round(right_late_s * SR))
    return near + room + thuds() + rumble() + air()


def top_cut(x):
    """Nothing passes above the cut-off."""
    return signal.sosfilt(signal.butter(12, 16630, fs=SR, output="sos"), x)


def record(dry):
    """One narrow band is dipped, the highest treble is cut, and peaks are softly rounded below full scale."""
    notch_hz, notch_width_hz, notch_share, top_hz = 7350, 500, .7, 16300
    ceiling = .95  # peaks bend from half of this on
    band = signal.lfilter(*signal.iirpeak(notch_hz, notch_hz / notch_width_hz, SR), dry)
    heard = signal.sosfilt(signal.butter(6, top_hz, fs=SR, output="sos"), dry - notch_share * band)
    over = np.maximum(abs(heard) - ceiling / 2, 0)
    rounded = heard - np.sign(heard) * (over - ceiling / 2 * np.tanh(2 * over / ceiling))
    return top_cut(rounded)


dry = scene()
out = record(dry)
store_pcm(out)
```